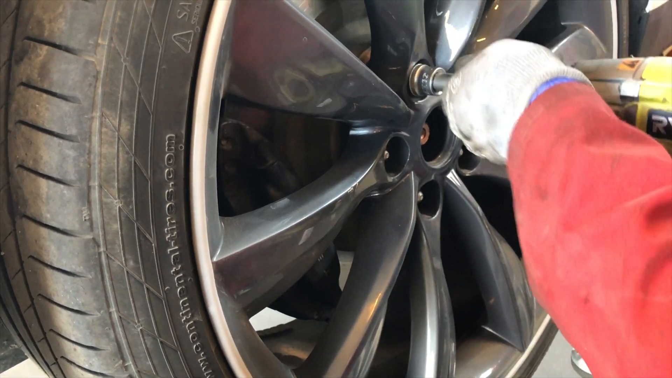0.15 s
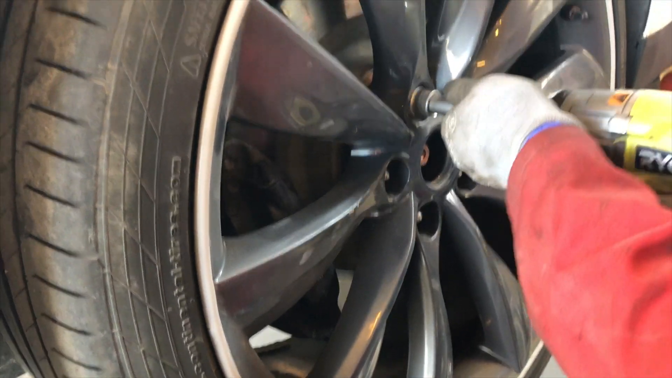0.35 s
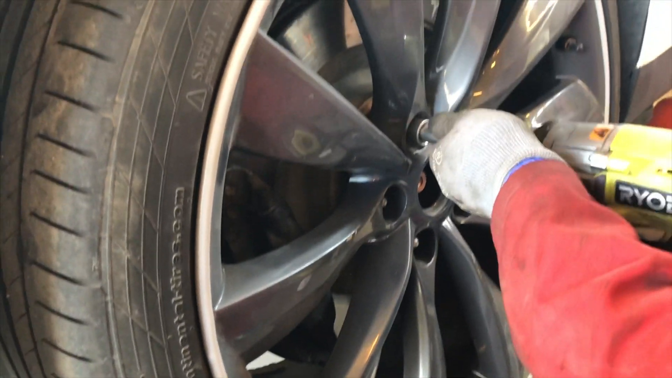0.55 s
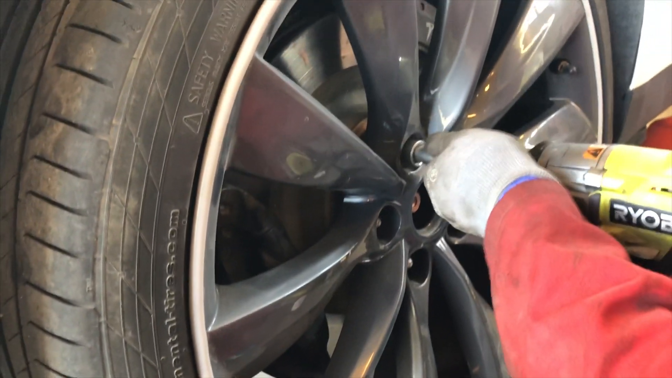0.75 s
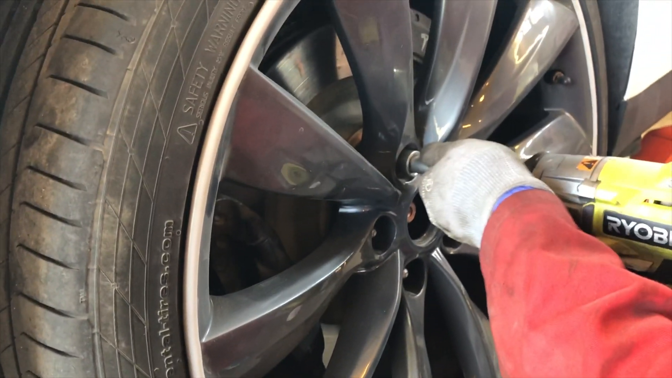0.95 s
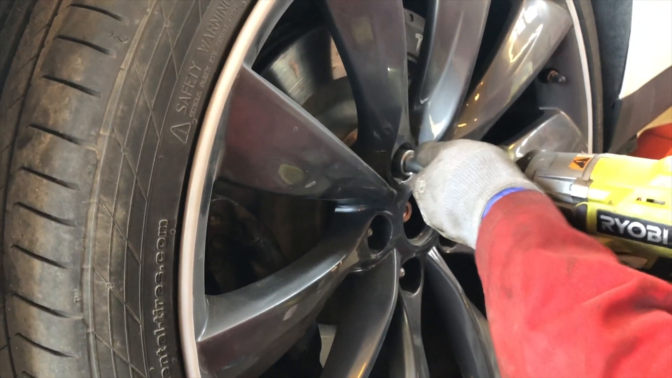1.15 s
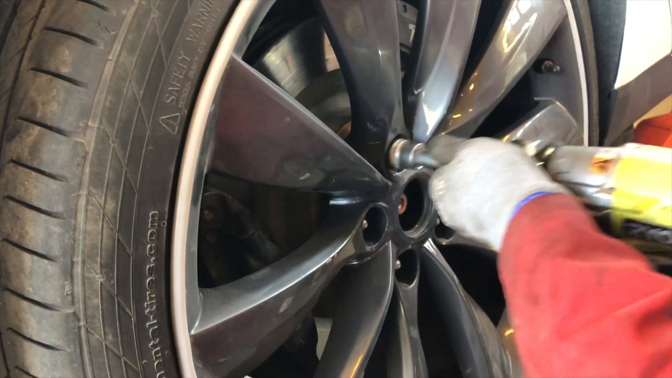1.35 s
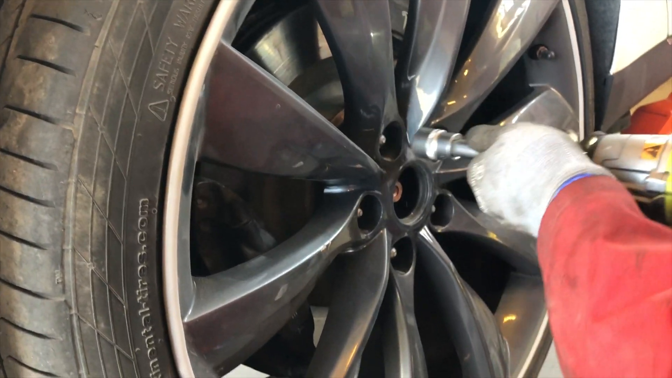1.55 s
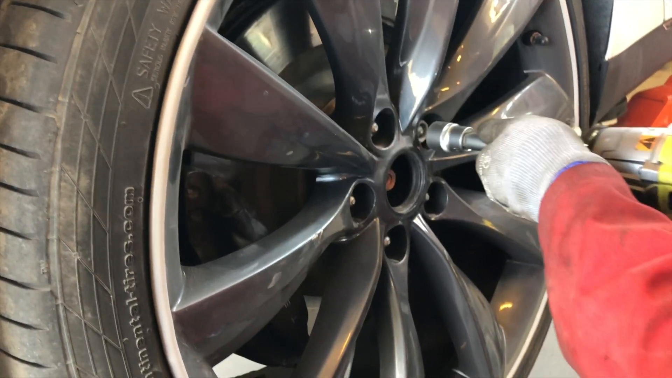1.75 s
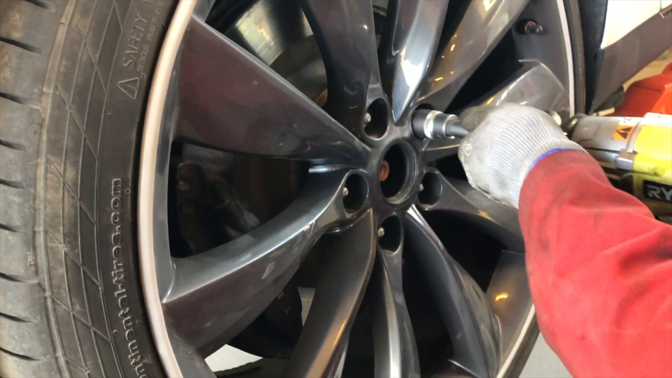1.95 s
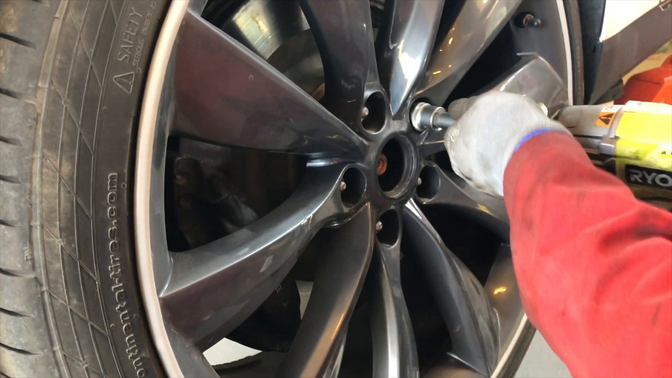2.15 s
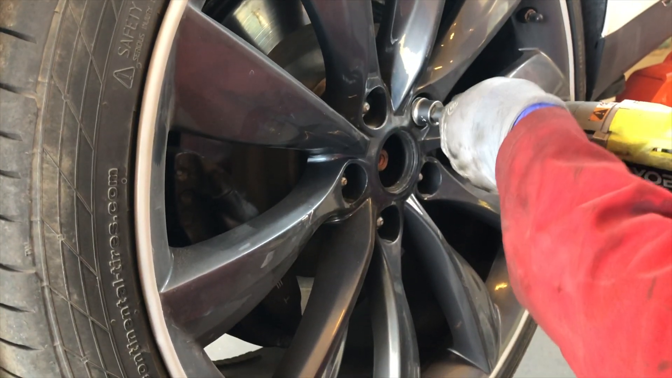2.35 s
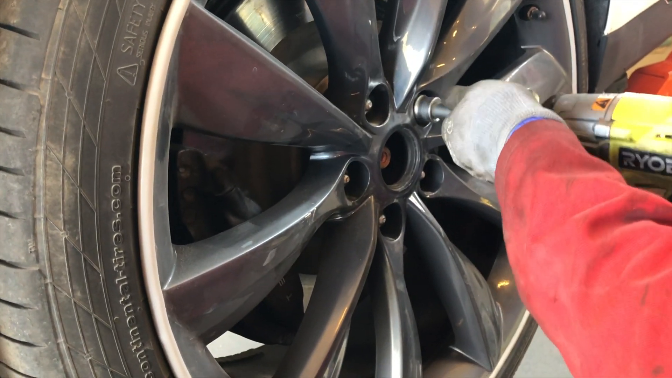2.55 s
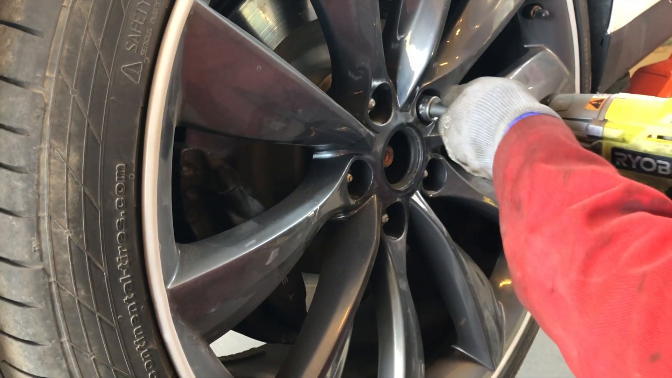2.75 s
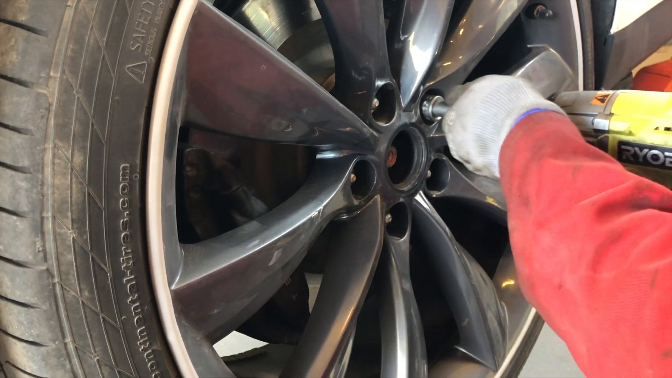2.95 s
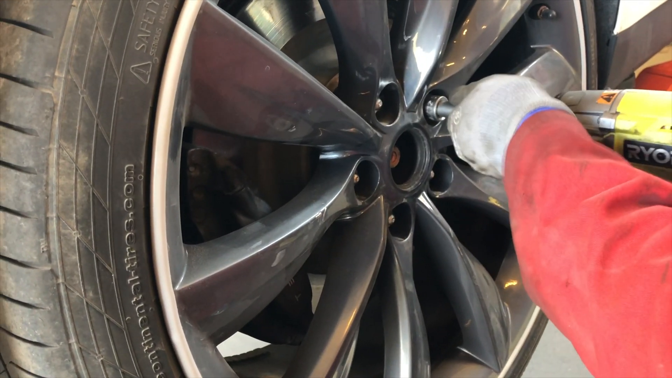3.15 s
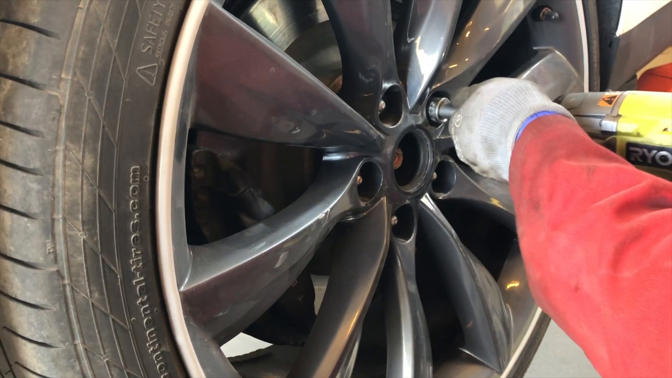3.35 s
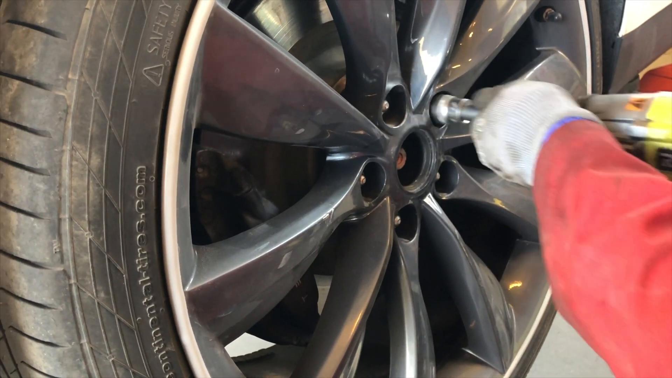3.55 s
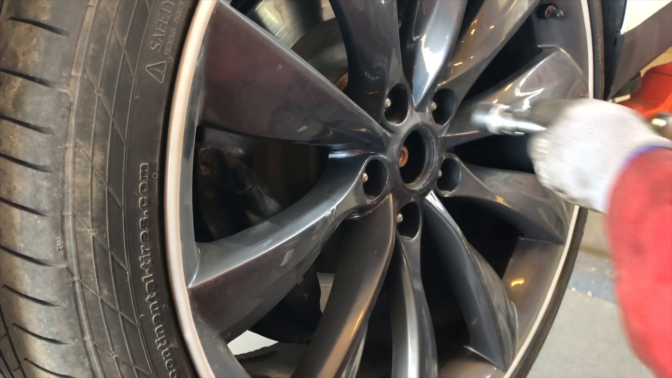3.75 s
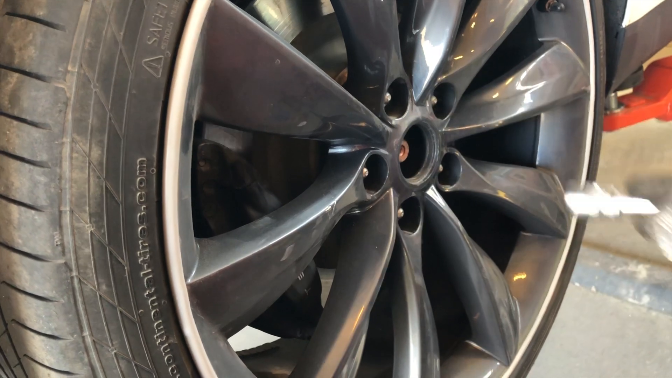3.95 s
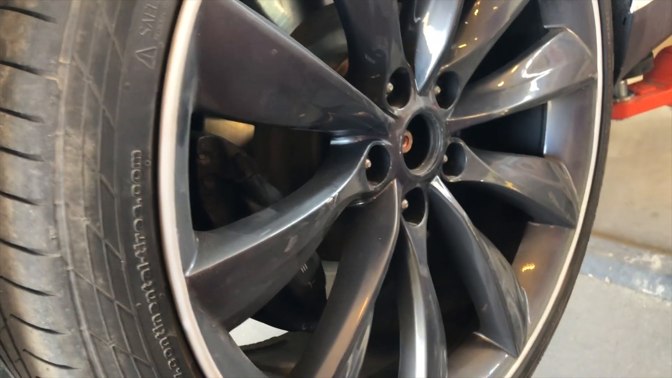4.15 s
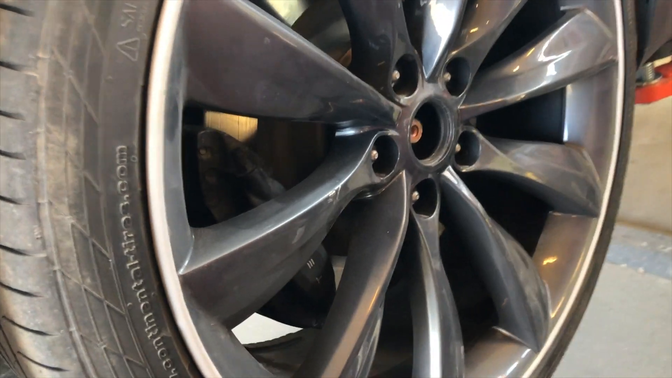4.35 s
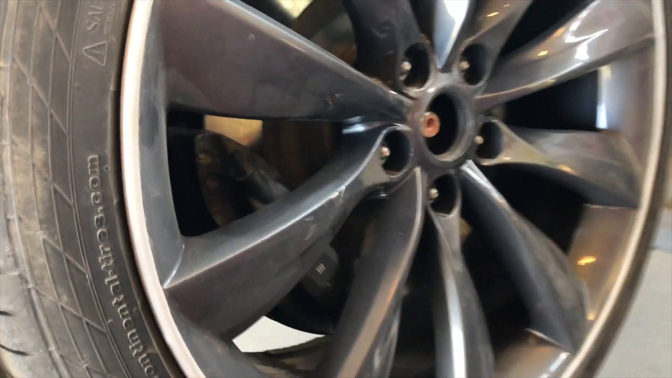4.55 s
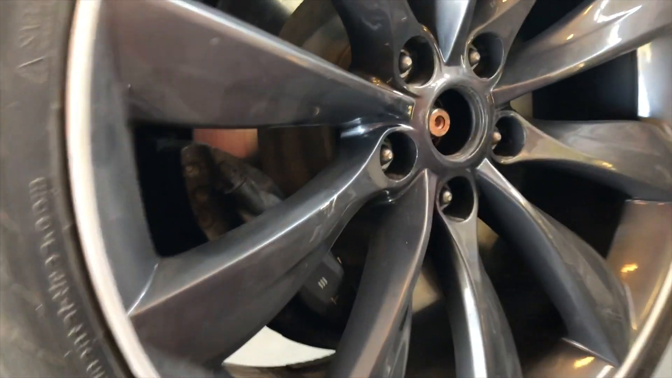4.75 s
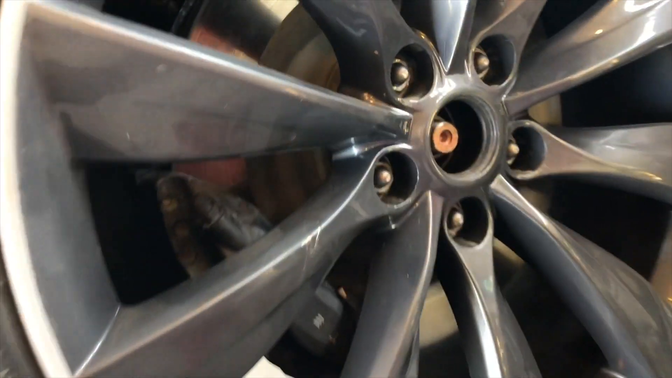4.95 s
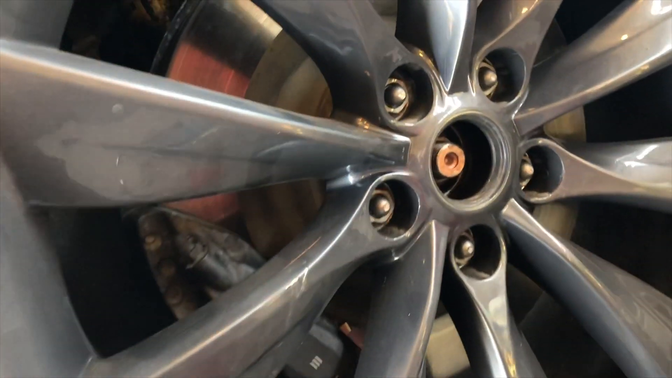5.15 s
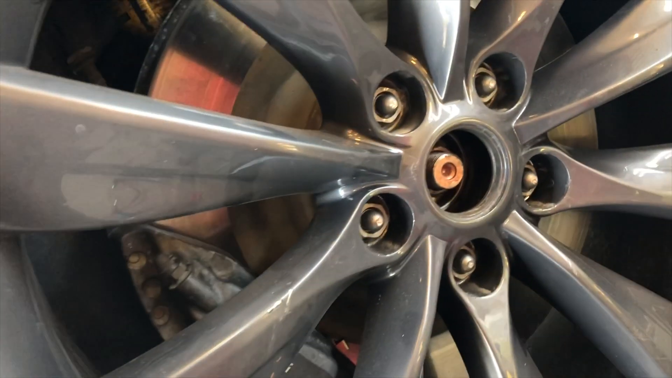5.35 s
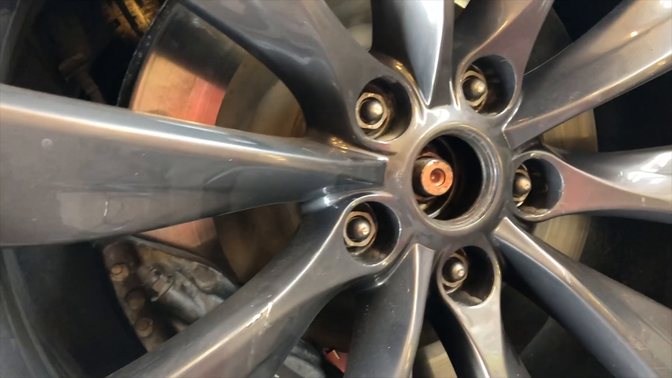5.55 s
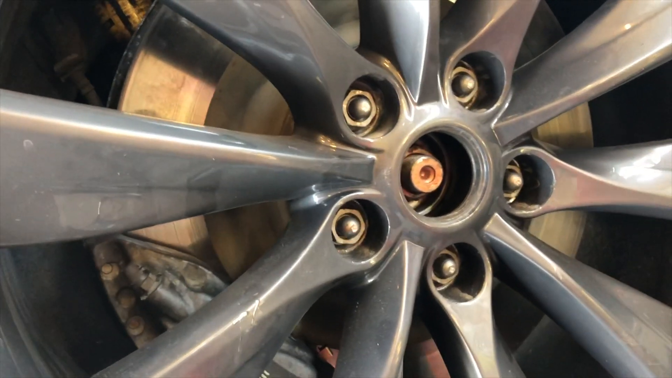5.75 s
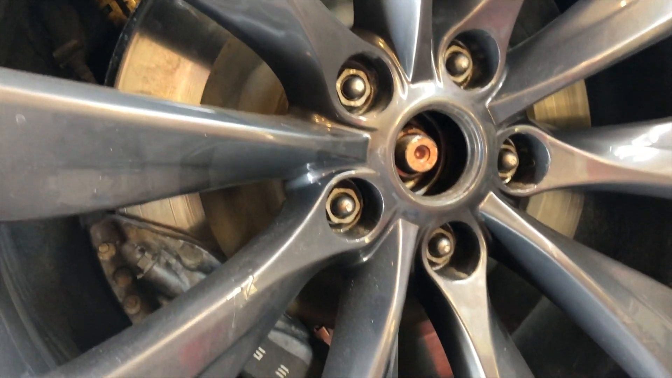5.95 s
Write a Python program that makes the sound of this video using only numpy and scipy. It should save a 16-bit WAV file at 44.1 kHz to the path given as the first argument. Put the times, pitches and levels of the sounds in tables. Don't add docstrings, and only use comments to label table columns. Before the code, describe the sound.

A cordless impact wrench fires two hard, rattling metallic bursts on a car wheel, each ringing out into a large garage before soft handling rustles.

```python
import sys
import numpy as np
from scipy import signal
from scipy.fft import rfft, irfft
from scipy.io import wavfile

SR = 44100
rng = np.random.default_rng(int(sys.argv[2]) if len(sys.argv) > 2 else 0)


def boost_factor(decibels):
    exponent = np.asarray(decibels, float) / 20
    return 10 ** exponent


def digitize_waveform(pressure):
    field = np.atleast_2d(pressure).T
    bounded = np.clip(field, -1, 1)
    quanta = np.round(bounded * 32767).astype(np.int16)
    wavfile.write(sys.argv[1], SR, quanta)


N = 268915


def rms_one(x):
    return x / np.sqrt(np.mean(x ** 2) + 1e-20)


def at_hz(points, hz):
    table_hz, values = np.transpose(points)
    return np.interp(np.log(hz + 1), np.log(table_hz), values)


def in_time(rows, silent_db=-140):
    s, *columns, level = np.transpose(rows)
    t = np.arange(N) / SR
    return [np.interp(t, s, c) for c in columns] + [np.interp(t, s, level, silent_db, silent_db)]


def coloured(spectrum):
    hz = np.arange(N // 2 + 1) * SR / N
    white = rfft(rng.standard_normal(N))
    return rms_one(irfft(white * boost_factor(at_hz(spectrum, hz)), N))


def two_tone():
    middle = coloured([(500, -32.5), (1200, -3.5), (5000, -8.0), (7000, -14.0), (9000, -53.0)])
    treble = coloured([(4000, -36.5), (6000, -4.5), (12000, -5.0), (16000, -12.0)])
    return middle, treble


def drift(rate):
    r = np.exp(-2 * np.pi * rate / SR)
    return rms_one(signal.lfilter([1], [1, -2 * r, r * r], rng.standard_normal(N + SR))[SR:])


def resonate(x, hz, width_hz):
    r = np.exp(-np.pi * width_hz / SR)
    top = (1 - r * r) / 2
    return signal.lfilter([top, 0, -top], [1, -2 * r * np.cos(2 * np.pi * hz / SR), r * r], x + 1e-18)


def bursts(times, gains, rise_s, fall_s):
    clicks = np.zeros(N)
    clicks[(np.asarray(times) * SR).astype(int)] = gains
    t = np.arange(int(.06 * SR)) / SR
    shape = (1 - np.exp(-t / rise_s)) * np.exp(-t / fall_s)
    return signal.fftconvolve(clicks, shape / shape.max())[:N]


def wavering(rows, rough_db):
    out, flutter, wobble = np.zeros(N), boost_factor(rough_db * drift(51)), drift(30)
    for start, end, first_hz, last_hz, db in rows:
        i, j = int(start * SR), int(end * SR)
        part = np.linspace(0, 1, j - i)
        hz = (first_hz + (last_hz - first_hz) * part) * (1 + .009 * wobble[i:j])
        tone = np.sin(2 * np.pi * np.cumsum(hz) / SR)
        out[i:j] += boost_factor(db + 2.5) * np.sin(np.pi * part) ** 0.54 * flutter[i:j] * tone
    return out


# frequency in Hz, level in dB per Hz.
EARLIER_TAIL = [(180, -33.5), (300, -13.5), (636, -13), (1010, -3), (2610, -19.5), (3920, -33), (5980, -32),
                (7000, -37.5), (9100, -60.5), (15400, -120)]


def earlier_burst():
    return boost_factor(-56.5 - 15 * np.arange(N) / SR) * coloured(EARLIER_TAIL)


# time in seconds, shop air in dB, rustle in dB.
BACKGROUND = [(0, -55.5, -67), (.1, -64.5, -92), (.3, -60, -66), (.55, -47, -53), (1.5, -68, -77),
              (2.1, -69, -89), (2.3, -62, -89), (2.5, -64.5, -74.5), (2.65, -51, -53.5), (3.7, -74.5, -74),
              (4.2, -67.5, -79), (4.5, -63, -74), (4.95, -60.5, -72.5), (5.3, -61.5, -64),
              (5.55, -56, -57.5), (5.7, -56.5, -66.5), (5.87, -56.5, -52), (6.1, -55, -62.5)]
# frequency in Hz, level in dB per Hz.
RUMBLE = [(88, -29.5), (150, -1.5), (263, -3.5), (371, -8.5), (635, -8.5), (769, -13), (1060, -10),
          (1240, -14), (2160, -29), (4000, -35), (5200, -55.5), (8800, -120)]
RUSTLE = [(470, -34.5), (800, -11.5), (1550, -2.5), (3100, -1), (15100, -23.5), (16500, -41.5)]
HUM = [(20, -32), (45, -16), (60, -2.5), (85, -6), (115, -2), (150, -24), (250, -47)]
# start in seconds, end in seconds, change in dB.
HUM_SWELLS = [
    (0.048, .3, 7.5),
    (0.368, 0.536, -8),
    (2.58, 2.753, -12),
    (4.9, 5.297, 3.5),
    (5.3, 6.194, 3),
]
# start in seconds, end in seconds, first pitch in Hz, last pitch in Hz, level in dB.
DRONES = [(.04, .13, 127, 118, -58), (.15, .25, 121, 119, -63), (.36, .53, 125, 122, -45.5),
          (2.57, 2.68, 122, 123, -47.5), (2.66, 2.76, 118, 127, -52), (4.89, 5.06, 118, 113.4, -61),
          (5.07, 5.33, 111.7, 103, -60.5), (5.3, 5.45, 103, 120, -62.5), (5.48, 5.72, 110.5, 122, -55),
          (5.56, 5.8, 223, 247, -59.5), (5.68, 5.86, 120.5, 124, -64), (5.85, 5.98, 183, 180, -57.5),
          (4.5, 4.6, 531, 523, -64.5), (5.43, 5.58, 3080, 3020, -66), (5.46, 5.57, 2470, 2450, -63.5)]
HUM_BELOW_AIR_DB, HUM_FADE_S, SHOP_DRONE_DB = -7, .05, -82


def background():
    air_db, rustle_db = in_time(BACKGROUND, silent_db=-60)
    t = np.arange(N) / SR
    swell_db = sum(db * np.clip(np.minimum(t - start, end - t) / HUM_FADE_S + .5, 0, 1)
                   for start, end, db in HUM_SWELLS)
    rumble = boost_factor(air_db + 0.59 * drift(4.7)) * coloured(RUMBLE)
    hum = boost_factor(air_db + HUM_BELOW_AIR_DB + swell_db + 1.5 * drift(4)) * coloured(HUM)
    far_colour = [(30, -29.5), (48, 2.0), (80, 0.5), (110, -34.5)]
    far = boost_factor(SHOP_DRONE_DB + 1.5 * drift(5)) * coloured(far_colour)
    rustle = boost_factor(rustle_db + 1.1 * drift(25) + 2.6 * drift(300)) * coloured(RUSTLE)
    return rumble + hum + far + wavering(DRONES, rough_db=3.0) + rustle


# middle in seconds, level in dB, colour in Hz, treble in dB, length in seconds.
BRUSHES = [(.005, -57, 2500, -24, 0.017), (1.47, -55, 8850, 1, .015), (1.544, -62, 111, -44, 0.033),
           (3.65, -64, 119.2, -40, .08), (2.3, -61.5, 1600, -30, 0.054), (2.301, -52, 340, -32, 0.023),
           (3.946, -62, 4900, -7, 0.057), (4.155, -67, 6000, -11, 0.013), (4.27, -68.5, 4050, -0.5, 0.067),
           (4.487, -65, 3650, -0.5, 0.078), (4.543, -61.5, 564, -31, 0.054), (4.638, -78.5, 3960, 6, 0.05),
           (4.932, -65.5, 3230, -3, 0.16), (5.163, -66.5, 8700, 1, .03), (5.352, -52, 4550, -7, 0.04),
           (5.353, -56, 1510, -22, 0.08), (5.354, -52.5, 680, -29, 0.041), (5.538, -57, 3060, -18, 0.04),
           (5.669, -63.5, 4280, -2, 0.029), (5.353, -57, 5630, -14, 0.083), (5.803, -53, 3270, -18, 0.055),
           (5.847, -45, 2940, -29, 0.03), (5.848, -46, 2920, -33, 0.024)]


def brushes():
    t, (middle, treble), white = np.arange(N) / SR, two_tone(), rng.standard_normal(N)
    out = 0
    for s, db, hz, treble_db, length in BRUSHES:
        body = rms_one(resonate(white, hz, hz * 0.2)) + 0.16 * middle + boost_factor(treble_db) * treble
        swish = np.exp(-(np.where(t < s, 6.0, 2) * (t - s) / length) ** 2)
        out = out + boost_factor(db) * swish * body
    return out * boost_factor(2.2 * drift(270))


# time in seconds, peak in dB, colour in Hz, treble in dB, 60 dB decay in seconds.
TOOL_TICKS = [(.271, -45, 5000, 8, .015), (0.2832, -30, 2564, 4, 0.03), (.2862, -18, 2000, 5, .03),
              (0.2940, -8, 2500, 9, 0.014), (0.2942, -9, 4800, 8, 0.014), (.2962, -16, 5500, 8, .025),
              (0.5156, -10, 5100, 4, 0.16), (1.2724, -13, 4150, 5, 0.075), (1.3062, -20, 3300, 8, 0.06),
              (1.3605, -22, 1710, -3, 0.017), (2.539, -31, 3004, 1, 0.03), (2.5546, -12, 1690, 4, 0.018),
              (2.5548, -13, 3470, -2, 0.018), (2.5392, -30, 9000, 8, .025), (3.5728, -8, 4250, -15, .03)]
# time in seconds, peak in dB, colour in Hz, treble in dB.
HAND_TICKS = [(0.0446, -42.5, 1660, -29), (0.104, -40, 1510, -3), (0.223, -41, 1530, 1),
              (2.14, -43, 1950, -26.5), (2.2418, -43.5, 1520, -9), (2.2952, -36.5, 1604, -22.5),
              (2.4814, -48.5, 2980, 7), (2.5147, -54.5, 3000, -1), (2.23, -51, 3500, -1.5),
              (4.472, -53.5, 3540, 1.5), (4.5196, -44, 1790, -18), (4.5943, -48, 3770, -18),
              (5.1088, -49, 1552, 3), (5.2122, -44, 2030, 0), (5.3004, -43, 4430, -7.5),
              (5.343, -32, 1520, -13), (5.3445, -33, 4800, -9), (5.3501, -32.5, 5000, -8),
              (5.349, -32, 1500, -20), (5.3575, -37, 5500, -10), (5.362, -37, 6300, -12),
              (5.437, -47, 7000, 3), (5.475, -42, 2410, 4), (5.648, -40.5, 3090, -10.5),
              (5.6914, -42, 4200, -21), (5.797, -38.5, 1880, -15), (5.8376, -32, 3080, -26),
              (5.843, -31.5, 2600, -27), (5.8476, -38, 3000, -20), (5.855, -39, 3280, -18),
              (5.888, -41, 3200, -15), (5.952, -39, 3100, -15), (5.993, -41, 3800, -9)]
HAND_T60_S = 0.02


def ticks():
    out, (middle, treble) = np.zeros(N), two_tone()
    t = np.arange(SR // 10) / SR
    for s, db, hz, treble_db, t60 in TOOL_TICKS + [(*row, HAND_T60_S) for row in HAND_TICKS]:
        i = int(s * SR)
        here = slice(i, i + len(t))
        decay = boost_factor(-60 * t / max(t60, .004)) + 1.1 * np.exp(-t / 0.00068)
        fall = boost_factor(db - 15.5) * decay * (1 - np.exp(-t / 0.0002))
        puff = middle[here] * fall
        puff[4] += 5 * boost_factor(db - 15.5)
        body = 0.83 * puff + 3.1 * resonate(puff, hz, hz * 0.24)
        out[here] += body + boost_factor(treble_db) * treble[here] * fall
    return out


# first blow in seconds, settled gap in ms, creep in ms per blow squared,
# head start in ms, blows to settle.
BURSTS = [
    (.53955, 17.62, .01136, 22.64, 6.7),
    (2.7453, 18.31, .0034, 27.19, 5.94),
]
BLOWS_PER_BURST = 42
# time in seconds, crack in dB.
FORCE = [(.54, -8), (.62, -14), (.7, -10.5), (.9, -9.5), (1.26, -11), (2.745, -9.5), (2.93, -8.5),
         (3.07, -10), (3.2, -9.5), (3.475, -10)]
# time in seconds, crack in dB, jolt height.
STRAYS = [(1.2796, -12.4, .22), (1.2905, -15, .02), (1.306, -21, 0), (1.3142, -9.5, 0), (1.3178, -13, 0),
          (1.3253, -13.2, 0), (2.7325, -26, 0), (3.4878, -12, 0), (3.5075, -11.5, -.07), (3.5178, -16.5, 0),
          (3.527, -23, 0), (3.5345, -24, 0), (3.5525, -22, 0), (3.5555, -14, 0), (3.5723, -11, 0)]
STRAY_DELAY_MS = 1.1
# first blow in seconds, number of
# blows, first signed height, last height, delay in ms.
FIRST_ROCKING = [(.554, 2, -.05, .06, .7), (.632, 1, -.04, 0, 1.1), (.683, 1, .05, 0, .6),
                 (.734, 3, -.17, .24, 1.3), (.786, 4, .23, .25, .67), (.857, 1, .06, 0, 1.1),
                 (.875, 4, .17, .02, .7), (.947, 4, .09, .21, 1.05), (1.02, 1, .13, 0, 1.07),
                 (1.037, 3, .19, .15, .8), (1.11, 3, -.05, .26, 1.25), (1.166, 2, .18, .12, 1.2),
                 (1.202, 2, .16, .2, .3), (1.24, 2, .15, .25, .95)]
SECOND_ROCKING = [(2.774, 3, -.15, .1, .6), (2.838, 1, -.11, 0, 1.4), (2.872, 2, .2, .15, 1.2),
                  (2.907, 1, -.14, 0, 1.5), (2.942, 2, .22, .13, .6), (2.977, 2, .04, .07, .6),
                  (3.013, 3, -.13, .22, .45), (3.069, 3, .17, .16, 1.05), (3.141, 2, -.15, .11, .7),
                  (3.197, 1, .055, 0, .7), (3.27, 3, -.25, .08, .75), (3.345, 3, -.07, .04, .9),
                  (3.4, 1, .14, 0, .93), (3.418, 4, -.25, .23, .95)]
# one run, in dB.
FIRST_BITE_DB = [0.1, 0.1, 0.091, 0.1, 0.95, 0.1, 0.1, 0.1, 0.1, 0.1, 0.1, 0.1, 0.1, 0.1]
SECOND_BITE_DB = [0.14, 0.1, 0.1, 0.1, 0.1, 0.1, 0.1, 0.1, 0.1, 0.1, 0.15, 0.1, 0.1, 0.1]


def blows():
    k = np.arange(BLOWS_PER_BURST)
    s = np.concatenate([first + (gap * k + creep * k ** 2 - lead * (1 - np.exp(-k / settle))) / 1000
                        for first, gap, creep, lead, settle in BURSTS])
    height, delay_ms, bite_db = np.zeros((3, len(s)))
    for (first, count, start, end, ms), db in zip(FIRST_ROCKING + SECOND_ROCKING,
                                                  FIRST_BITE_DB + SECOND_BITE_DB):
        turn = np.arange(count)
        run = np.argmin(abs(s - first)) + turn
        height[run] = np.sign(start) * np.linspace(abs(start), end, count) * (-1) ** turn
        delay_ms[run], bite_db[run] = ms, db
    regular = np.transpose([s, np.interp(s, *np.transpose(FORCE)), height, delay_ms, bite_db])
    rows = np.concatenate([regular, [(*row, STRAY_DELAY_MS, 0) for row in STRAYS]])
    return rows[np.argsort(rows[:, 0])]


SEATED_S = .73, 2.9


def stage(s):
    return np.searchsorted([SEATED_S[0], 2, SEATED_S[1]], s)


# start in seconds, first mesh in Hz, top mesh in Hz,
# time constant in seconds, slowness of the start.
SPIN_UPS = [
    (.305, 2880, 5420, .059, 1.15),
    (2.558, 3560, 5215, .074, 1.8),
]
# mesh in Hz, level in dB.
WHINE = [(3000, -54), (4250, -46), (4550, -31), (5250, -27.5), (5400, -22.5)]
LOAD_SAG_HZ, LOAD_SAG_S = 480, 0.016


def spin_up(engage, start, first_hz, top_hz, lag, bend):
    t = np.arange(N) / SR
    free_hz = top_hz - (top_hz - first_hz) * np.exp(-(np.clip(t - start, 0, 1) / lag) ** bend)
    sag = np.clip(1 - (engage - t) / LOAD_SAG_S, 0, 1)
    whine_db = np.where((t > start) & (t < engage), at_hz(WHINE, free_hz) - 4 * sag, -140)
    return free_hz - LOAD_SAG_HZ * sag, whine_db


# time in seconds, level in dB.
RASP = [
    [(.284, -41.5), (.3, -33), (.33, -29.5), (.4, -23), (.52, -22.5), (.55, -24), (1.28, -21),
     (1.33, -16.5), (1.345, -29.5)],
    [(2.54, -38), (2.6, -31), (2.73, -27.5), (2.78, -24), (3.2, -18.5), (3.5, -22), (3.54, -26),
     (3.58, -31), (3.595, -41)],
]
# frequency in Hz, level in dB per Hz.
RASP_COLOUR = [(59, -32), (100, -9.5), (157, -19), (338, -4.5), (615, -14.5), (1350, -6.5), (3780, -2.5),
               (5210, -6.5), (5920, -4.5), (14500, -6.5), (15500, -8.5), (16500, -46)]
# start in seconds, end in seconds, first pitch in Hz, last pitch in Hz, level in dB.
TUGS = [(.296, .306, 2400, 3000, -31), (.316, .329, 2480, 2720, -28), (.329, .346, 2850, 3350, -30),
        (.362, .39, 3650, 3780, -33), (.335, .385, 1600, 1820, -34), (.395, .425, 3950, 4100, -34),
        (.435, .465, 4200, 4300, -32), (.44, .535, 2500, 2580, -36), (.518, .548, 2150, 1930, -25),
        (2.559, 2.572, 2680, 2900, -28), (2.579, 2.595, 2720, 2980, -25), (2.606, 2.62, 3430, 3580, -34),
        (2.597, 2.645, 1630, 1850, -30), (2.63, 2.7, 1830, 2070, -38), (2.675, 2.7, 4120, 4180, -33),
        (2.61, 2.75, 285, 350, -41)]
# multiple of the mesh pitch, level in dB.
MOTOR_ORDERS = [(.8, -3.0), (.4, -2.5)]
# frequency in Hz, level in dB.
HOUSING = [(1450, -20.5), (1700, -5), (2100, -5.5), (2500, -4.5), (2900, -9), (3400, 1.5), (4300, 1.5)]
COMMUTATOR_DB = -43
LULL_DEPTH, LULL_AFTER_S = .55, .007


def motor():
    t = np.arange(N) / SR
    rasp = sum(boost_factor(in_time(rows)[0]) for rows in RASP) * boost_factor(0.86 * drift(60) + 1.9 * drift(700))
    rasp = rasp * np.clip(1 - bursts(blows()[:, 0] + LULL_AFTER_S, LULL_DEPTH, .005, .006), 0, 1)
    out = rasp * coloured(RASP_COLOUR)
    spokes = 1.9 * resonate(out, 1620, 40) + 1.2 * resonate(out, 1270, 60) + 1.1 * resonate(out, 2570, 60)
    out += spokes + 1.3 * resonate(out, 6810, 70) * (t > SEATED_S[1])
    out += boost_factor(-3) * wavering(TUGS, rough_db=4.0)
    for burst, row in zip(BURSTS, SPIN_UPS):
        mesh_hz, whine_db = spin_up(burst[0], *row)
        free = whine_db > -100
        mesh_turn = 2 * np.pi * np.cumsum(mesh_hz * (1 + 0.004 * drift(90))) / SR
        out += boost_factor(whine_db + 2.1 * drift(60)) * np.sin(mesh_turn)
        out += 1.4 * free * resonate(out, 480, 40)
        rotor_turn = 2 * np.pi * np.cumsum(mesh_hz * .065) / SR
        out += boost_factor(whine_db - 21.5 + 1.7 * drift(25)) * np.sin(rotor_turn)
        for k, db in MOTOR_ORDERS:
            turn = 2 * np.pi * np.cumsum(k * mesh_hz * (1 + 0.0082 * drift(80))) / SR
            level_db = COMMUTATOR_DB + db + at_hz(HOUSING, k * mesh_hz) + 1.8 * drift(60)
            out += free * boost_factor(level_db) * np.sin(turn)
    return out


# one stage of stage(), in
# dB.
SCRAPE_DB = [-27.5, -32, -31, -28.5]
SCRAPE_TREBLE_DB = [-1, -6, -6, -4]
SCRAPE_LEAD_S, SCRAPE_HZ = .0042, 2700


def cam_scrape():
    s = blows()[1:, 0]
    db = np.array(SCRAPE_DB)[stage(s)] + 2.7 * rng.standard_normal(len(s))
    treble_db = np.array(SCRAPE_TREBLE_DB)[stage(s)]
    middle, treble = two_tone()
    scrape = middle * bursts(s - SCRAPE_LEAD_S, boost_factor(db), .002, .003)
    hiss = treble * bursts(s - SCRAPE_LEAD_S, boost_factor(db + treble_db), .004, .003)
    first_loose = scrape * (np.arange(N) < SEATED_S[0] * SR)
    socket = 1.2 * resonate(scrape, SCRAPE_HZ, 900) + 1.2 * resonate(scrape, 1600, 200)
    return .7 * scrape + hiss + socket + 2.2 * resonate(first_loose, 4300, 350)


# frequency in Hz, level in dB per Hz.
CRACK_COLOUR = [(530, -24), (900, -16), (1630, -4), (1960, -6.5), (3600, -7), (4220, -2), (6230, -4),
                (11900, -7.5), (15500, -8.5), (16500, -33.5)]
# frequency in Hz, width in Hz, level in dB.
FIRST_LOOSE = [(1300, 90, -13), (1610, 80, -13.5), (3250, 300, -5), (4250, 260, 6.5), (4600, 200, -3),
               (5700, 220, -6), (6700, 400, -5), (7450, 200, -5), (8800, 140, -8), (9150, 140, -7),
               (9900, 200, -10), (11250, 140, -12), (13850, 210, -8), (14450, 300, -9)]
FIRST_SEATED = [(1260, 60, -5.5), (1390, 60, -6), (1640, 55, -8), (2555, 60, -9.5), (2950, 150, -7),
                (4220, 300, 6), (5700, 300, -6), (6970, 150, 1.5), (7400, 260, 2), (8180, 250, -1),
                (8880, 400, 1), (11050, 400, -4), (11750, 200, -6), (12570, 190, -7)]
SECOND_LOOSE = [(1612, 60, -4), (2570, 90, -8), (3020, 150, -7), (4400, 220, 1), (4100, 200, -4),
                (6850, 200, 2.5), (7100, 250, 1.5), (7650, 200, 0), (8050, 150, -2), (8550, 180, 1),
                (9150, 200, -2), (11900, 900, -2), (14200, 500, -6)]
SECOND_SEATED = [(1615, 55, -4), (2570, 80, -11), (3000, 800, -2.5), (4400, 130, -4), (6810, 90, 0),
                 (7060, 240, 1.5), (7700, 300, -4), (8680, 240, 1.5), (9140, 130, -2), (9850, 500, 1),
                 (10500, 250, -3), (11300, 200, -3), (11900, 420, 3.5), (12270, 160, -2)]
# one stage of stage(), in dB.
RATTLE_DB = [-19, -11, -9, -9]
FORCE_SCATTER_DB = 0.8
REPEAT_SHARE = .72
LOW_MODE_LAG_S, LOW_MODE_HZ, REBOUND_S = .0007, 5000, .0062


def hammer():
    s, db = blows().T[:2]
    s = s + .0002
    starts, rattle = (s * SR).astype(int), boost_factor(np.array(RATTLE_DB)[stage(s)])
    chatter = coloured(CRACK_COLOUR) * boost_factor(1.9 * drift(900))
    chatter = chatter * (bursts(s, 0.78, 0.00015, 0.0007) + bursts(s, rattle, 0.0009, 0.003))
    latest = np.maximum(np.searchsorted(starts, np.arange(N), "right") - 1, 0)
    since = np.clip(np.arange(N) - starts[latest], 0, SR // 10 - 1)
    habit = rng.standard_normal((2, SR // 10))[latest % 2, since]
    strike = REPEAT_SHARE * habit + np.sqrt(1 - REPEAT_SHARE ** 2) * rng.standard_normal(N)
    ringing = 0
    for number, modes in enumerate((FIRST_LOOSE, FIRST_SEATED, SECOND_LOOSE, SECOND_SEATED)):
        on_nut = stage(s) == number
        luck = rng.standard_normal((len(s), len(modes)))
        contact = bursts(s, 0.57 * on_nut, 0.0003, 0.0008)
        push = strike * (contact + bursts(s, .5 * rattle * on_nut, 0.0015, 0.003))
        push[starts + 12] += 5.1 * on_nut
        late = np.roll(push, int(LOW_MODE_LAG_S * SR)) + 0.1 * np.roll(push, int(REBOUND_S * SR))
        for k, (hz, width_hz, mode_db) in enumerate(modes):
            drive, scatter_db = (late, 1) if hz < LOW_MODE_HZ else (push, 1.8)
            share = boost_factor(mode_db + 8 + scatter_db * luck[latest, k])
            mode = resonate(share * drive, hz, width_hz)
            ringing = ringing + mode * np.sqrt(300 / width_hz) * (-1) ** k
    both = chatter + ringing
    energy = np.array([np.sqrt(np.mean(both[i:i + SR // 200] ** 2)) for i in starts])
    gain = (boost_factor(db - 1.0 + FORCE_SCATTER_DB * rng.standard_normal(len(s))) / energy)[latest]
    return chatter * gain, ringing * gain


# frequency in Hz, level in dB, 60 dB decay in seconds,
# heard from in seconds, waver in dB.
RINGS = [
    (705, -47, 1.35, 3.545, 1.5),
    (11815, -55, .5, 3.67, 4),
]


def rings():
    t, out = np.arange(N) / SR, 0
    for hz, db, t60, s, waver_db in RINGS:
        level = boost_factor(db - 60 * np.maximum(t - s, 0) / t60 + waver_db * drift(14))
        out = out + level * np.clip((t - s) / .02, 0, 1) * np.sin(2 * np.pi * hz * t)
    return out


# ms after the start, log width, height, extra dB when upward.
JOLT_SWELLS = [
    (1.15, 1, 1.1, 0.5),
    (3, 0.9, 1.31, -1.5),
    (15.1, 0.31, 0.93, 0.7),
    (30.8, 0.58, 0.21, 2.5),
]
JOLT_TURNS, JOLT_BEND, JOLT_START = 8.1, .1632, .769
JOLT_JITTER_MS, JOLT_SCATTER_DB = .2, 1.5


def jolts():
    out = np.zeros(N)
    rows = blows()
    for (s, db, height, delay_ms, bite_db), luck in zip(rows, rng.standard_normal((len(rows), 2))):
        delay_ms, bite_db = delay_ms + JOLT_JITTER_MS * luck[0], bite_db + JOLT_SCATTER_DB * luck[1]
        i = int(s * SR)
        ms = np.maximum(np.arange(i, i + SR // 12) / SR * 1000 - s * 1000 - delay_ms, 1e-4)
        swell = 0
        for at_ms, width, size, up_db in JOLT_SWELLS:
            gain = size * boost_factor(up_db * np.sign(height) + bite_db * (at_ms < 6))
            swell = swell + gain * np.exp(-(np.log(ms / at_ms) / width) ** 2)
        sweep = np.sin(2 * np.pi * JOLT_TURNS * (ms / 10) ** JOLT_BEND + JOLT_START)
        out[i:i + len(ms)] += height * swell * sweep
    return out - 0.39 * resonate(out, 335, 110)


# frequency in Hz, 60 dB decay in seconds.
HALL_T60 = [(150, 0.7), (500, 2.3), (1300, 2.38), (2500, 2.2), (4500, 1.15), (9000, 0.52), (15000, 0.27)]
# frequency in Hz, level in dB.
HALL_COLOUR = [(150, -13), (600, 1.5), (1500, -3.5), (4000, -2.5), (8000, -0.5), (16000, 2)]


def hall(x):
    t, tail = np.arange(int(2.5 * SR)) / SR, 0
    edges = 100 * 2 ** np.arange(0, 7.6, .5)
    for low, high in zip(edges, edges[1:]):
        sos = signal.butter(2, [low, high], "band", fs=SR, output="sos")
        band = signal.sosfilt(sos, rng.standard_normal(len(t)))
        hz = np.sqrt(low * high)
        tail = tail + band * boost_factor(at_hz(HALL_COLOUR, hz) - 60 * t / at_hz(HALL_T60, hz))
    tail = tail * (1 - np.exp(-t / 0.0038))
    return signal.fftconvolve(x, tail / np.sqrt(np.sum(tail ** 2)))[:N]


# frequency in Hz, width in Hz, level in dB.
WHEEL_TAIL = [(1247, 16, -6.5), (1530, 20, -3.5), (1780, 32, -0.5), (2600, 27, -2), (4410, 140, -3.5)]
HALL_DB = -20


def scene():
    chatter, ringing = hammer()
    rest = motor() + ticks() + cam_scrape()
    low_ringing = signal.sosfilt(signal.butter(4, 5200, fs=SR, output="sos"), ringing)
    wet = boost_factor(HALL_DB) * hall(boost_factor(1.5) * chatter + 0.73 * low_ringing + rest)
    wet += sum(boost_factor(db - 2) * resonate(wet, hz, width_hz) for hz, width_hz, db in WHEEL_TAIL)
    return (background() + earlier_burst() + brushes() + rest + chatter + ringing + rings() + wet)[None]


def low_pass(x):
    return signal.sosfilt(signal.butter(12, 16970, fs=SR, output="sos"), x)


def record(dry):
    x = .67 * np.tanh((dry + jolts()) / .62)
    x = signal.sosfilt(signal.ellip(9, .5, 48, 15790, fs=SR, output="sos"), x)
    return low_pass(x)


dry = scene()
out = record(dry)
digitize_waveform(out)
```